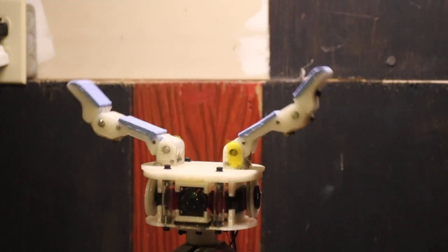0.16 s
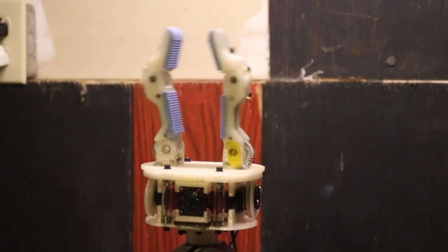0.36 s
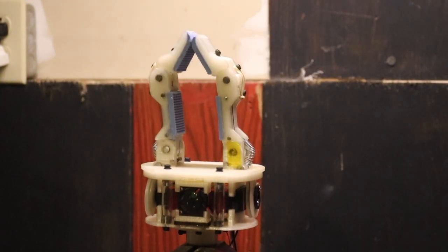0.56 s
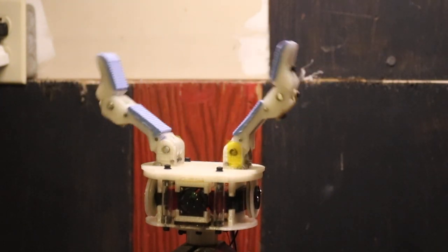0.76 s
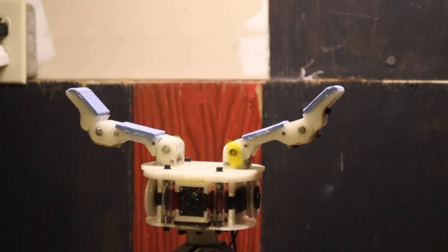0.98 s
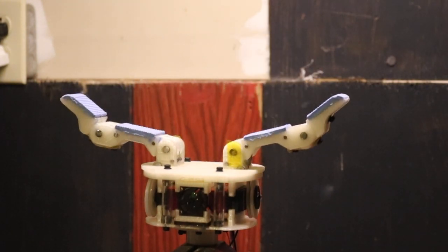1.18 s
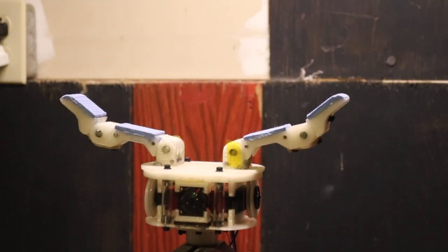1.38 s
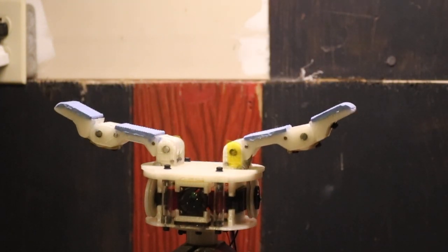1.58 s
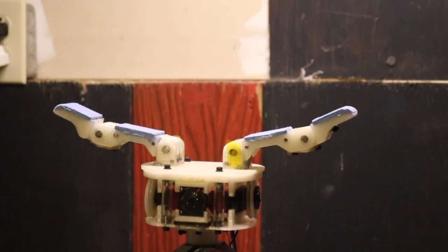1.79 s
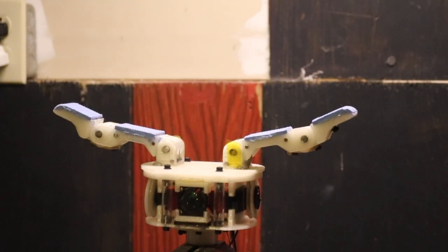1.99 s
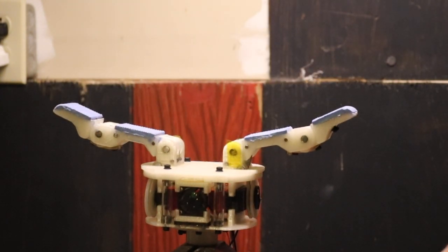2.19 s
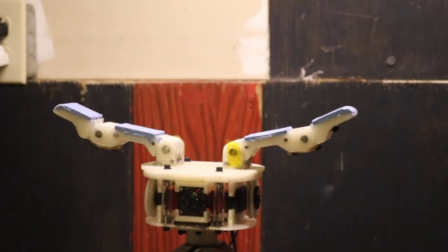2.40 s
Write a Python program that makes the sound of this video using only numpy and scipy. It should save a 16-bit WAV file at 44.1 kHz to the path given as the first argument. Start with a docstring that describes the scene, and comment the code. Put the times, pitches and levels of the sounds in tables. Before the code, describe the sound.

A small robotic gripper's geared servos whine sharply, click shut, then rasp open in a room

```python
"""A small robot gripper twitches, closes its two fingers, opens them again and lets them creep to rest.
The geared servos whine up and down in the fast closing stroke: harmonics of the tooth rate over a rattle.
Turning slowly they only rasp, made of random impacts and rubbing noise; the joints chatter in short bursts.
The fingertips meet with dying bursts of noise, and the base thuds with dying sine tones.
Close microphones hear it in a small room with mains hum and a faint fan."""
import sys
import numpy as np
from scipy import signal
from scipy.fft import rfft, irfft, next_fast_len
from scipy.io import wavfile

SR = 44100
rng = np.random.default_rng(int(sys.argv[2]) if len(sys.argv) > 2 else 0)


def store_wav(level_fs):
    """Save 16-bit WAV to argv[1]."""
    pcm = np.round(np.clip(np.atleast_2d(level_fs), -1, 1) * 32767)
    wavfile.write(sys.argv[1], SR, pcm.T.astype(np.int16))


N = 108045
T = np.arange(N) / SR   # time in seconds

# Tone colour of the gears turning slowly. Each row: frequency in Hz, relative strength in dB.
SLOW_COLOUR = [(200, -5.5), (400, -14), (700, -16), (1200, -11), (1550, -13), (2050, -9.5), (2550, 0.5),
               (3300, 0.5), (4100, -3), (5300, -1.5), (7900, -5), (10000, -7.5), (12000, -14), (15800, -17)]


def from_db(db):
    """Turn decibels into a gain."""
    return 10 ** (np.asarray(db) / 20)


def rms_one(x):
    """Scale a sound to an average power of 1."""
    return x / np.sqrt(np.mean(x ** 2) + 1e-20)


def level(rows):
    """Gain along a curve of (seconds, dB), dying within milliseconds beyond its ends."""
    s, db = np.transpose(rows)
    outside = np.maximum(0, np.maximum(s[0] - T, T - s[-1]))
    return from_db(np.interp(T, s, db)) * np.exp(-outside / 0.0027)


def at_hz(points, hz):
    """Read a table between its rows, with frequency on a logarithmic scale."""
    f, v = np.transpose(points)
    return np.interp(np.log(hz + 1e-3), np.log(f), v)


def equalise(x, curve_db):
    """Strengthen or weaken each frequency by a curve in dB."""
    size = next_fast_len(N + SR // 2)
    hz = np.arange(size // 2 + 1) * SR / size
    return irfft(rfft(x, size) * from_db(curve_db(hz)), size)[..., :N]


def drift(rate):
    """Smooth random wandering of spread 1, slower for a lower rate in Hz."""
    # computed at a tenth of the sample rate; the first 4000 values let the filter settle
    r = np.exp(-20 * np.pi * rate / SR)
    slow = signal.lfilter([1], [1, -2 * r, r * r], rng.standard_normal(N // 10 + 4002))[4000:]
    return np.interp(np.arange(N) / 10, np.arange(len(slow)), rms_one(slow))


def turns(hz):
    """Phase in radians of a changing rate, from a random starting point."""
    return 2 * np.pi * (np.cumsum(hz) / SR + rng.random())


def reflections(t60):
    """A cloud of echoes with unit energy that dies by 60 dB in t60 seconds."""
    t = T[:SR // 3]
    cloud = rng.standard_normal(len(t)) * from_db(-60 * t / t60) * (t > .0005)
    return cloud / np.sqrt(np.sum(cloud ** 2))


def stereo(mid, side):
    """Make left and right from a centre signal and a side signal of opposite sign in each ear."""
    # Width of the image. Each row: frequency in Hz, gain of the side signal in dB.
    width = [(60, -18), (125, -16.5), (250, -10.5), (700, -4.5), (1300, -2), (2400, -4.5), (4400, -2.5),
             (8000, 0), (15000, 1)]
    # Lean of the image. Each row: frequency in Hz, left against right in dB.
    lean = [(60, -.3), (700, -1.5), (1300, -2), (2400, -3.5), (4400, -1), (8000, -1), (15000, 0.3)]
    side = equalise(side, lambda f: at_hz(width, f))
    left = equalise(mid + side, lambda f: at_hz(lean, f) / 2)
    right = equalise(mid - side, lambda f: -at_hz(lean, f) / 2)
    return np.array([left, right])


def housing(x, colour):
    """The plastic housing colours the contacts and boosts them at its resonances."""
    # Resonances. Each row: centre in Hz, width in Hz, boost in dB.
    resonances = [(1542, 79, 10.5), (2390, 150, 2.5), (2536, 70, 0.5), (3203, 100, 4), (3500, 99, 3.5),
                  (5240, 290, 4), (6830, 320, 3.5), (7870, 130, 5.5), (9700, 120, 1)]

    def curve_db(f):
        peaks = sum(db / (1 + (2 * (f - hz) / width) ** 2) for hz, width, db in resonances)
        low_cut = 10 * np.log10(1 + (colour[0][0] / (f + 1)) ** 4)   # below the first row
        return at_hz(colour, f) + peaks - low_cut
    return rms_one(equalise(x, curve_db))


def contacts(per_s, spread_db, rub):
    """Uneven tooth impacts at random moments over smooth rubbing, in two unrelated signals."""
    sizes = from_db(spread_db * np.minimum(rng.exponential(1, (2, N)), 4))
    signs = rng.choice([-1, 1], (2, N))
    hits = rng.random((2, N)) < per_s / SR
    return rms_one(sizes * signs * hits) + rub * rng.standard_normal((2, N))


def background():
    """Room air is coloured noise; mains and fan are tones that waver slightly in pitch and level."""
    # Air. Each row: frequency in Hz, relative strength in dB.
    air_colour = [(13, -24), (22, -3.5), (109, 0), (143, -4.5), (178, -4), (210, -7), (241, -2),
                  (269, -10.5), (300, -8), (396, -8), (467, -13), (832, -14), (2120, -15), (4710, -17),
                  (15800, -36.5)]
    # Mains and fan tones. Each row: middle frequency in Hz, middle level in dB.
    hum_tones = [(120, -67), (179, -64), (239, -58.5), (300.5, -62.5), (360, -64.5), (479.5, -65.5),
                 (1583, -67.5), (2109, -62.5), (3163, -66), (4576, -68.5), (4748, -65.5)]
    air_db, waver_hz, flutter_db = -49, 1.7, 2.06
    air = [rms_one(equalise(rng.standard_normal(N), lambda f: at_hz(air_colour, f))) for _ in range(2)]
    hum = 0
    for hz, db in hum_tones:
        size = np.sqrt(2) * from_db(db + flutter_db * drift(2.8))
        hum = hum + size * np.exp(1j * turns(hz + waver_hz * drift(3.52)))
    # the side hears each tone a quarter cycle away from the centre
    return stereo(from_db(air_db) * air[0] + hum.real, from_db(air_db) * air[1] + 0.94 * hum.imag)


def slow_moves():
    """Turning slowly, the gears rasp without a pitch: random tooth impacts and rubbing."""
    # First twitch, then opening. Each row: time in seconds, level in dB before the trim below.
    twitch = [(0.0, -33), (0.042, -41), (0.086, -32.5), (0.102, -32.5), (0.15, -53.5)]
    opening = [(0.6, -51), (0.644, -30), (0.684, -36.5), (0.77, -34), (0.78, -31), (0.802, -35),
               (0.834, -29), (0.884, -35.5), (0.956, -34), (0.994, -39.5), (1.024, -34.5), (1.09, -60)]
    # Creeping moves. Each row: start and end in seconds, level in dB, rise and fall in seconds.
    creeps = [(1.033, 1.304, -50.5, .03, 0.07), (1.416, 1.866, -45, 0.13, 0.18)]
    # Tone colour of creeping. Each row: frequency in Hz, relative strength in dB.
    creep_colour = [(800, -22), (1300, -29), (1700, -3.5), (2200, -7.5), (3000, -0.5), (3900, -3.5),
                    (7700, -5), (9000, -11.5), (12000, -19), (15800, -23)]
    # Treble of the rasp. Each row: time in seconds, gain of the treble in dB.
    treble_gain = [(.1, -3), (.6, -3), (.65, 4), (.7, -6), (.785, 6), (.85, 2), (.95, -5), (1.03, -12),
                   (1.1, -6)]
    twitch_trim_db, opening_trim_db = -2, -1
    treble_above_hz = 17500   # the treble fades in gradually towards this frequency

    rasp = housing(contacts(1500, spread_db=-0.5, rub=1.0) * from_db(1.5 * drift(47)), SLOW_COLOUR)
    treble = equalise(rasp, lambda f: -20 * np.log10(1 + (treble_above_hz / (f + 1)) ** 6))
    rasp = rasp + treble * (from_db(np.interp(T, *np.transpose(treble_gain))) - 1)
    load = from_db(twitch_trim_db) * level(twitch) + from_db(opening_trim_db) * level(opening)

    creep = housing(contacts(2500, spread_db=-1.0, rub=0.99), creep_colour)
    effort = 0
    for start, end, db, rise, fall in creeps:
        ramp = np.minimum((T - start) / rise, (end - T) / fall)
        effort = effort + from_db(db) * np.clip(ramp, 0, 1)
    return rasp * load + creep * effort


def chatter():
    """Brief swelling runs of slips in the joints, each in its own band of pitch."""
    # Each row: start in seconds, length in seconds, peak level in dB, centre of the band in Hz.
    runs = [(0.058, 0.068, -41, 3000), (0.497, 0.046, -28, 6000), (0.631, 0.024, -38, 6560),
            (.772, 0.019, -36.5, 10000), (0.776, 0.027, -39.5, 1680), (.808, 0.058, -33.5, 2740),
            (1.014, 0.031, -40, 2900), (1.44, 0.011, -48.5, 7000), (1.638, 0.13, -46.5, 2780)]
    band_octaves = 0.65
    slips = housing(contacts(850, spread_db=3.5, rub=0.75), SLOW_COLOUR)
    out = 0
    for s, length, db, hz in runs:
        edges = np.minimum(hz * 2 ** (np.array([-.5, .5]) * band_octaves), SR / 2 - 1)
        band = rms_one(signal.sosfilt(signal.butter(2, edges, "band", fs=SR, output="sos"), slips))
        swell = np.sin(np.pi * np.clip((T - s) / length, 0, 1))
        out = out + band * from_db(db) * swell
    return out


def whine(mesh, mesh_hz):
    """Harmonics of the meshing teeth flutter and sweep through gearbox resonances, singing at speed."""
    # Each row: frequency in Hz, middle level in dB of a harmonic there at the reference gear level.
    gearbox = [(1000, -66), (1400, -45.5), (1800, -39.5), (2300, -37), (2850, -28.5), (3700, -27.5),
               (4200, -32.5), (5300, -30.5), (5600, -36), (6100, -33), (7300, -35.5), (9200, -39),
               (11000, -40.5)]
    # Phase flutter of harmonics 1 to 6: typical pitch wander of each in Hz.
    smears = [9, 20, 50, 50, 90, 140]
    flutter_db, sings_above_hz = 3.5, 1220
    singing = 1 / np.sqrt(1 + (sings_above_hz / mesh_hz) ** 8)
    tones = 0
    for k, smear in enumerate(smears, 1):
        size = np.sqrt(2) * from_db(at_hz(gearbox, k * mesh_hz) + flutter_db * drift(88))
        tones = tones + size * np.sin(k * mesh + turns(smear * drift(167)))
    return singing * tones


def closing():
    """Fast stroke: a fluttering gear whine over the rattle of teeth that meet at a changing rate."""
    # Rate at which teeth meet. Each row: time in seconds, rate in Hz.
    mesh_rate = [(.17, 560), (.22, 1000), (.248, 1180), (.268, 1396), (.298, 1650), (.315, 1735),
                 (.345, 1808), (.41, 1858), (.435, 1825), (.462, 1720), (.485, 1540), (.502, 1390),
                 (.58, 800)]
    # Gear noise. Each row: time in seconds, level in dB before the trims below.
    gear_level = [(.15, -51), (.175, -44.5), (.2, -29.5), (.225, -20.5), (.25, -21), (.4, -21),
                  (.465, -22.5), (.49, -20.5), (.515, -24.5), (.55, -34.5), (.6, -58)]
    # Tone colour of the rattle. Each row: frequency in Hz, relative strength in dB.
    fast_colour = [(55, -17), (85, -5.5), (140, -24), (250, -23), (600, -30.5), (1100, -19.5),
                   (1450, -19.5), (2100, -12.5), (2600, -2.5), (3100, 2), (3600, -0.5), (4050, -2.5),
                   (4700, 0), (5600, 3.5), (6400, -1.5), (7500, -1), (9800, -2), (12000, -10.5),
                   (15800, -21)]
    rattle_trim_db, whine_side_db = -2.5, -3
    whine_reference_db = -21   # gear level at which the whine has the strength in its own table
    pinion_teeth = 12
    sway_rad, sway_depth = .2, .15   # an off-centre pinion sways the mesh once a turn

    mesh_hz = np.interp(T, *np.transpose(mesh_rate))
    mesh = turns(mesh_hz)
    shaft = np.sin(mesh / pinion_teeth)
    swayed = mesh + sway_rad * shaft
    tones = np.array([whine(swayed, mesh_hz), from_db(whine_side_db) * whine(swayed, mesh_hz)])
    pulsing = (1 + 0.27 * np.cos(mesh)) * (1 + sway_depth * shaft)
    rattle = housing(contacts(5000, spread_db=0.5, rub=0.93) * pulsing, fast_colour)
    return level(gear_level) * (from_db(rattle_trim_db) * rattle + from_db(-whine_reference_db) * tones)


def thuds():
    """The base thuds on its mount: low sine tones that rise softly and die away."""
    # Each row: start in seconds, level in dB before the soft rise and decay, pitch in Hz.
    thud_rows = [(.236, -27, 162), (0.456, -32, 187), (.84, -34, 147), (.878, -29.5, 155.5),
                 (1.015, -38, 149)]
    t60_s, rise_s = .09, .012
    out = np.zeros(N)
    for s, db, hz in thud_rows:
        age = np.maximum(T - s, 0)
        shape = from_db(db - 60 * age / t60_s) * (1 - np.exp(-age / rise_s))
        out += shape * np.sin(2 * np.pi * hz * age)
    return out


def knocks():
    """The fingers knock as they meet or take up slack: sudden bursts of dull noise that die away."""
    # Each row: time in seconds, starting level in dB.
    knock_rows = [(0.248, -35), (0.472, -20.5), (0.48, -26), (0.488, -25.5), (.496, -50), (.915, -32)]
    # Tone colour. Each row: frequency in Hz, relative strength in dB.
    knock_colour = [(60, -8), (200, -14.5), (450, -16), (900, -18), (1500, -12.5), (3000, 0), (7000, -10.5),
                    (15000, -21)]
    t60_s = 0.054
    envelope = np.zeros(N)
    for s, db in knock_rows:
        envelope += (T >= s) * from_db(db - 60 * np.abs(T - s) / t60_s)
    noise = equalise(rng.standard_normal((2, N)), lambda f: at_hz(knock_colour, f))
    return envelope * rms_one(noise)


def with_echoes(x):
    """Add echoes from nearby surfaces and from the room."""
    near = from_db(-12) * reflections(0.15)
    room = from_db(-11.5) * reflections(0.18)
    return x + signal.fftconvolve(x, near + room)[:N]


def scene():
    """The gripper with its echoes over the background."""
    gripper = slow_moves() + chatter() + closing() + thuds() + knocks()
    mid, side = (with_echoes(x) for x in gripper)
    side_trim_db = -0.5
    return stereo(mid, from_db(side_trim_db) * side) + background()


def record(dry):
    """Cut the top steeply above 15750 Hz."""
    return signal.sosfilt(signal.ellip(12, .1, 80, 15750, fs=SR, output="sos"), dry)


dry = scene()
out = record(dry)
store_wav(out)
```